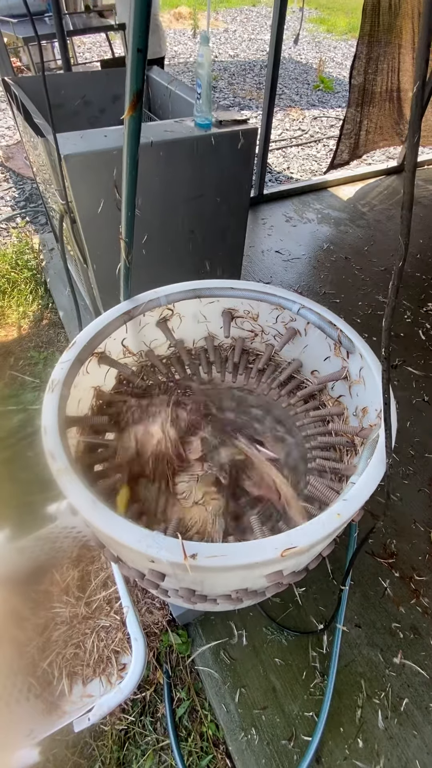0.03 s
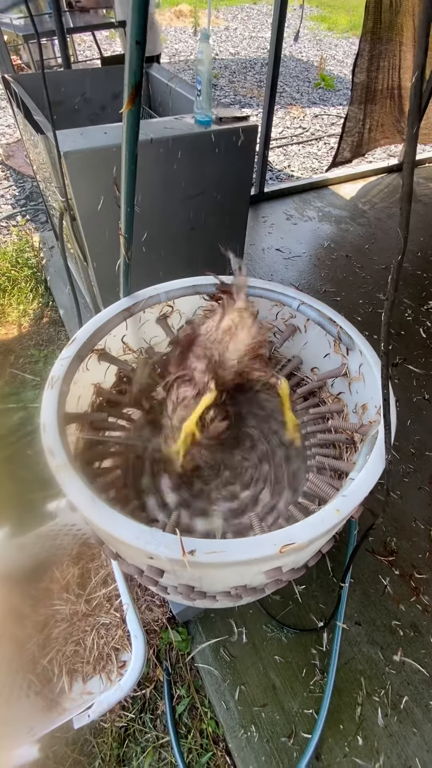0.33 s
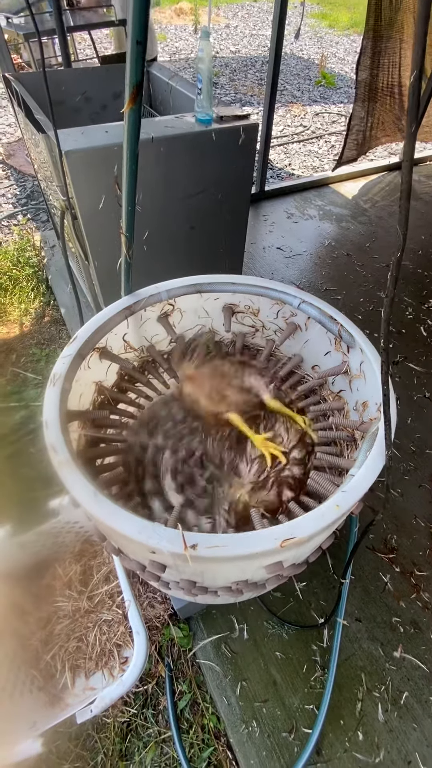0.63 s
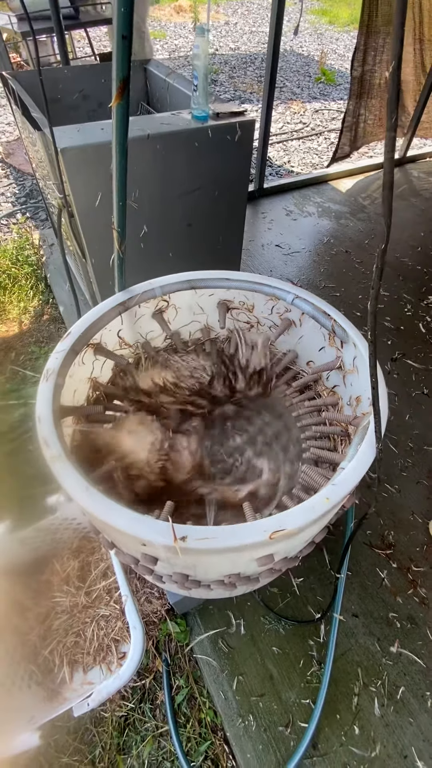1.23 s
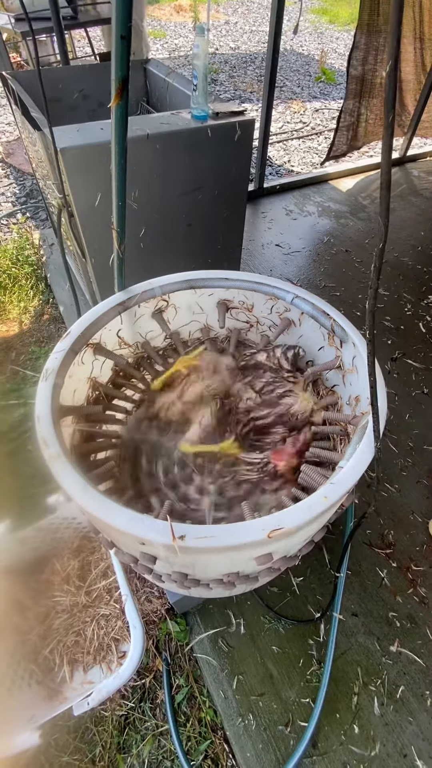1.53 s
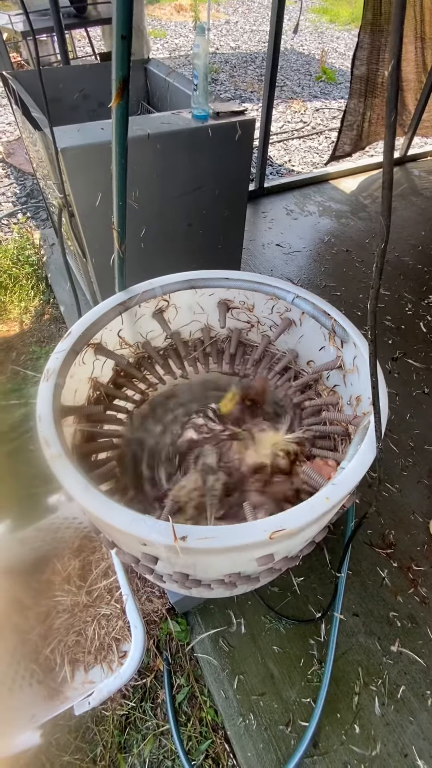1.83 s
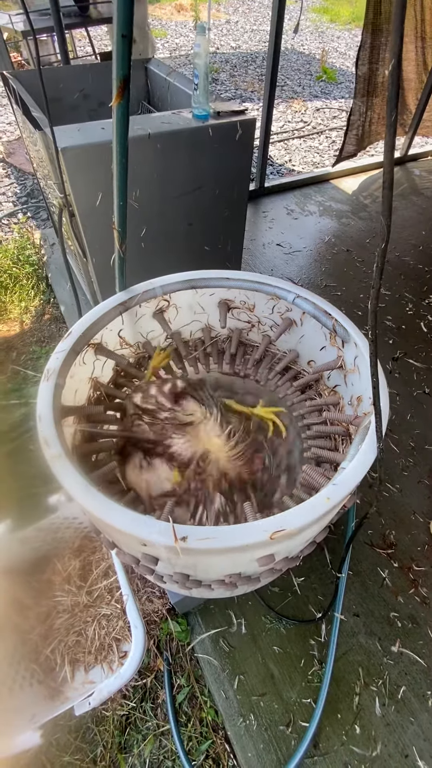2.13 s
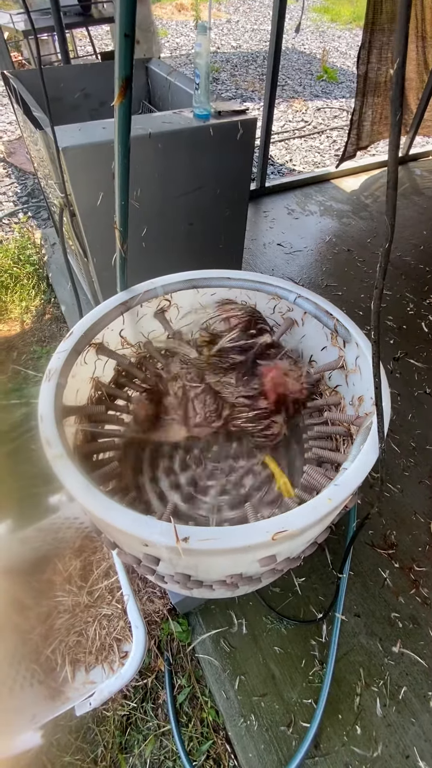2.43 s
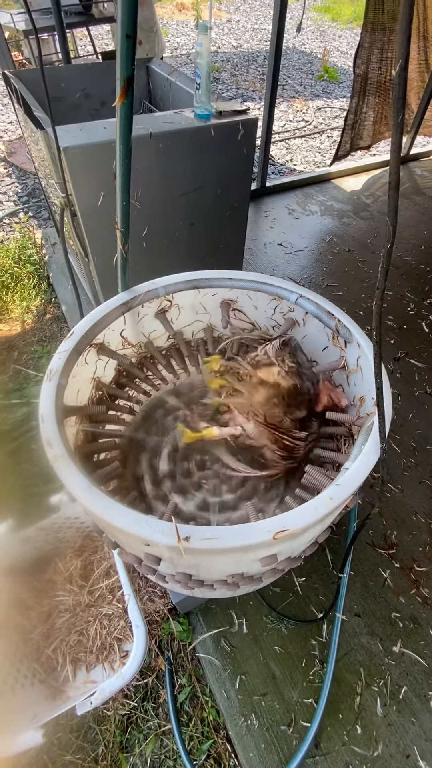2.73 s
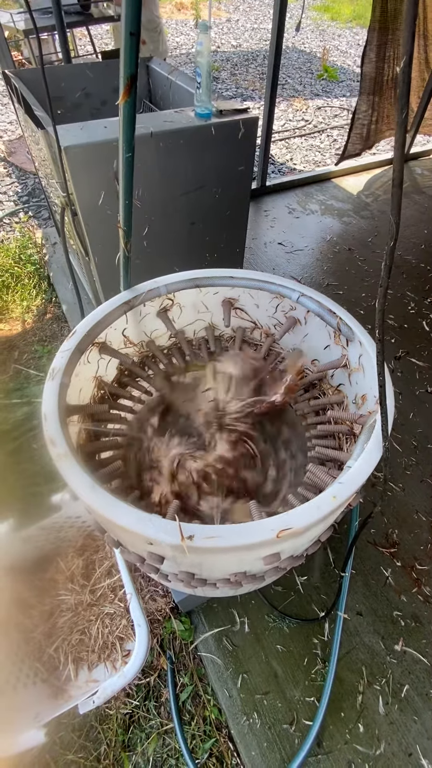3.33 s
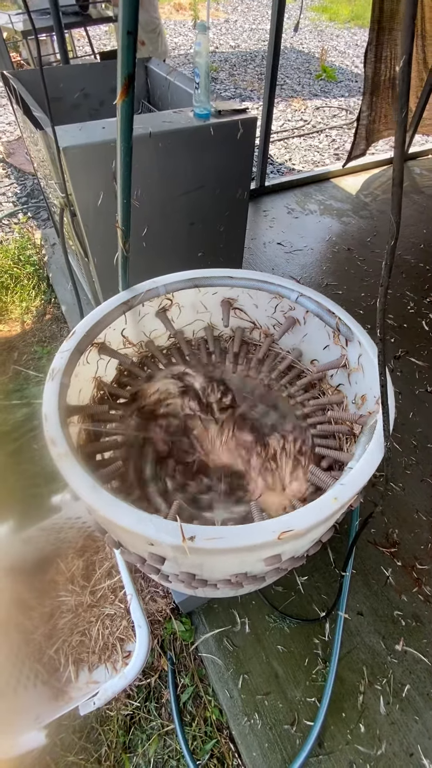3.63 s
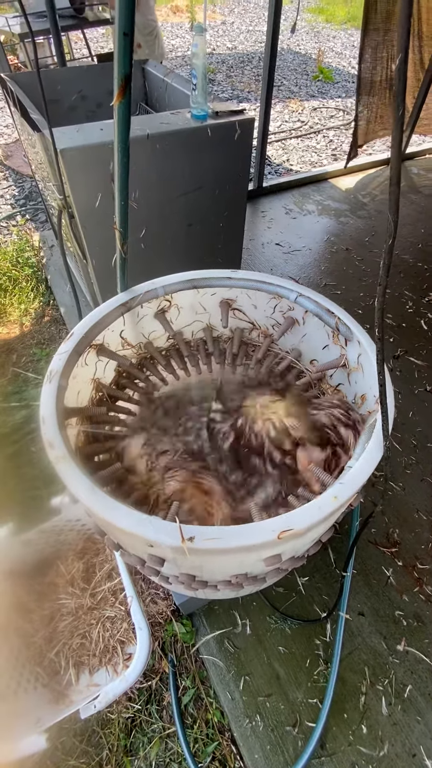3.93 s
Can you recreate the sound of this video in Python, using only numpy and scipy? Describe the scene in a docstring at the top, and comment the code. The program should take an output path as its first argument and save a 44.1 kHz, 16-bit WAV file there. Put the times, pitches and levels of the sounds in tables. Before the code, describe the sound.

Spinning poultry plucker drones steadily, birds thumping hollowly against the plastic drum amid hissing spray.

```python
"""A hard, hollow knock lands over the roar of a tub plucker running outdoors.
Its motor hums while rubber fingers drum on wet carcasses and set the plastic tub ringing.
The birds rub and slap along the wall and knock against it now and then; feet and wing tips
crack on it, and water spatters. A close pair of microphone ports picks it all up."""
import sys
import numpy as np
from scipy import signal
from scipy.fft import rfft, irfft
from scipy.io import wavfile
from scipy.ndimage import uniform_filter1d

SR = 44100
rng = np.random.default_rng(int(sys.argv[2]) if len(sys.argv) > 2 else 0)


def bounce(signal):
    """Save signal as a 16-bit WAV file at the path given by the first command-line argument."""
    frames = np.transpose(np.atleast_2d(signal))
    limited = np.clip(frames, -1, 1)
    pcm = np.round(limited * 32767).astype(np.int16)
    wavfile.write(sys.argv[1], SR, pcm)


N = 176400
T = np.arange(N) / SR
BIN_HZ = np.maximum(np.arange(N // 2 + 1) * SR / N, 1)


# The notes the tub rings at. Each row: pitch in Hz, width in Hz, level in dB before the roar swells.
TUB_NOTES = [(66.6, 8.5, -44), (99.2, 65, -41.5), (119.3, 26, -27), (169.2, 37, -26.5),
             (223.5, 17.5, -27.5), (248, 29.5, -29), (291.5, 20.7, -30.5), (342, 5.9, -30.5),
             (364.3, 24, -29.5)]
def tub():
    """Rubber fingers drum on the tub; the tumbling birds shift the weight from note to note."""
    out = 0
    for hz, width_hz, db in TUB_NOTES:
        hits = clicks(per_s=1100, spread_db=1.5)
        hits = np.pad(hits, ((0, 0), (SR // 2, 0)), "wrap")  # a run-up, so it rings from the start
        ring = resonate(hits, hz, 2 * width_hz)
        ring = resonate(ring, hz, 2 * width_hz)[:, -N:]  # a second pass narrows the note
        out = out + from_db(db + 1.5 * drift(5.8)) * rms_one(ring)
    return out


# The tones of the motor and drive. Each row: pitch in Hz, level in dB before the roar swells.
MOTOR_TONES = [(64, -49), (120, -29.5), (330.2, -31), (359.8, -29.5)]
def motor():
    """The motor hums, shaken in level and pitch by the tumbling birds."""
    out = 0
    for hz, db in MOTOR_TONES:
        level = from_db(db + 3.5 * drift(6))
        phase = 2 * np.pi * hz * T + .5 * drift(5)
        out = out + level * np.sqrt(2) * np.sin(phase)
    return out


# The weight on the fingers. Each row: time in seconds, level in dB (only its rise and fall count).
FINGER_LOAD = [(0, -17.5), (.06, -19), (.48, -22.5), (.8, -18), (.96, -20), (1.22, -19.5), (1.42, -19.5),
               (1.6, -16), (1.66, -18.5), (1.87, -19.5), (1.96, -20.5), (2.21, -16.5), (2.36, -19.5),
               (2.68, -20), (3.06, -18.5), (3.15, -19), (3.3, -18), (3.9, -19.5)]
def machine():
    """Tub and motor blend into one roar that swells as the birds press on the fingers."""
    roar = evened(to_stereo(tub()) + motor())
    load_db = over_time(FINGER_LOAD)
    return roar * from_db(load_db - load_db.mean())


# How hard the birds rub along the wall. Each row: time in seconds, level in dB.
RUB_LEVEL = [(0, -24.5), (.27, -32.5), (.35, -25.5), (.43, -33), (.64, -27.5), (.88, -30), (.98, -32),
             (1.045, -27), (1.17, -31), (1.41, -29.5), (1.51, -23), (1.6, -27), (1.67, -29.5), (2.9, -30.5),
             (2.975, -24), (3.02, -32.5), (3.08, -29.5), (3.8, -25), (4, -30.5)]
# The tone of the rubbing. Each row: frequency in Hz, relative strength in dB.
RUB_TONE = [(25, -66.5), (90, -38.5), (380, -22.5), (430, -1.5), (515, 4.5), (610, 1.5), (1000, -7.5),
            (1400, -11), (2100, -23), (4000, -58)]
def rubbing(surge):
    """Wet feathers drag over the fingers in a dense run of small slips, louder at each slap."""
    slips = coloured(clicks(per_s=2500, spread_db=1), RUB_TONE)
    level = from_db(over_time(RUB_LEVEL) + 1.5 * drift(31))
    return level * rms_one(slips * (1 + .45 * surge))


def slap_surges(decay_s=.007):
    """Small wet slaps at random: a loudness curve that jumps at each one and dies quickly."""
    contacts = np.abs(clicks(per_s=38, spread_db=1.4)[0])
    return signal.lfilter([1], [1, -np.exp(-1 / (decay_s * SR))], contacts + 1e-18)


# A carcass hits the wall. Each row: start in seconds, strength in dB, pitch it rings most in Hz.
BLOWS = [(0.0157, -13, 1260), (0.02, -7.5, 1200), (.022, -9.5, 1020), (.345, -25, 553), (1.034, -21, 642),
         (1.482, -23, 800), (1.514, -15, 574), (1.55, -14, 600), (1.593, -14, 349), (1.805, -14.5, 1460),
         (2.977, -17, 1194), (2.99, -18, 896), (3.072, -20, 1210), (3.4824, -11.5, 1000), (3.489, -10, 883),
         (3.786, -5.5, 510), (3.798, -9, 448), (3.8035, -9.5, 910)]
# The notes of the struck wall. Each row: pitch in Hz, gain in dB, seconds to fade by 60 dB.
WALL_NOTES = [(371, -1, 0.061), (494, 4, 0.016), (610, 2.5, 0.039), (714, -5, 0.047), (945, -11, 0.056),
              (1075, -3.5, 0.02), (1375, -0.5, 0.0092), (1780, 1.5, 0.012)]
def knocks(width_octaves=.5):
    """Each blow is a push and a short squelch that ring the wall, most at notes near its own pitch."""
    pushes = []
    for start, db, _ in BLOWS:
        push = from_db(-25) * rng.standard_normal(N) * dying(start, decay_s=.007)  # the squelch
        push[int(start * SR)] += 1  # the hit itself
        pushes.append(from_db(db) * push)
    pushes, pitches = np.array(pushes), np.array(BLOWS)[:, 2]
    out = 0
    for k, (hz, db, fade_s) in enumerate(WALL_NOTES):
        shares = np.exp(-.5 * (np.log2(hz / pitches) / width_octaves) ** 2)
        fade, step = from_db(-60 / (fade_s * SR)), 2 * np.pi * hz / SR
        ring = signal.lfilter([0, np.sin(step)], [1, -2 * fade * np.cos(step), fade ** 2], shares @ pushes)
        sign = (-1) ** (k // 2)  # every other pair of notes swings the opposite way
        out = out + sign * from_db(db) * ring
    return out


# Air trapped by the hardest blows. Each row: start in seconds, level in dB, starting pitch in Hz,
# seconds to swell.
AIR_POCKETS = [(.0225, -3, 675, 0.0082), (3.4815, -6.5, 793, 0.0053), (3.782, -12.5, 538, 0.0045)]
def hollows(sag_per_s=11.8):
    """A pocket of air swells into a short hollow tone whose pitch sags as the carcass smothers it."""
    out = 0
    for start, db, hz, swell_s in AIR_POCKETS:
        age = np.clip(T - start, 0, 5 * swell_s)
        rise = (age / swell_s) ** 2
        phase = 2 * np.pi * hz * age * (1 - sag_per_s * age / 2)
        out = out + from_db(db) * rise * np.exp(1 - rise) * np.sin(phase)
    return out


# Sharp hits on the wall. Each row: start in seconds, level in dB, centre pitch in Hz.
SHARP_HITS = [(0.0692, -14.5, 2600), (1.481, -14.5, 2090), (1.5426, -13, 3030), (1.578, -23, 4500),
              (1.626, -20.5, 2800), (1.657, -28, 5500), (1.755, -22, 5500), (1.7882, -25, 3300),
              (1.803, -21.5, 2000), (2.0177, -17.5, 6000), (2.0255, -17, 7000), (2.574, -15, 2700),
              (2.982, -18.5, 4200), (3.014, -24.5, 3500), (3.6406, -17.5, 3400), (3.753, -21, 3400),
              (3.804, -15.5, 1380), (3.982, -29.5, 2460)]
def cracks():
    """Feet, wing tips and wet skin smack the wall in short, bright bursts of noise."""
    out = 0
    for start, db, hz in SHARP_HITS:
        burst = rms_one(resonate(rng.standard_normal((2, N)), hz, width_hz=hz))
        out = out + from_db(db) * dying(start, decay_s=.0028) * burst
    return out


# Splashes. Each row: start in seconds, level in dB, centre pitch in Hz, decay time in seconds.
FEATHER_SLAPS = [(.015, -22.5, 5760, 0.023), (0.625, -23.5, 4560, 0.017), (0.642, -28, 4100, .025),
                 (.872, -30.5, 1970, 0.034), (1.017, -28, 2460, 0.048), (1.448, -28.5, 1590, 0.084),
                 (3.07, -25, 1900, 0.0089)]
def splashes():
    """Wet feathers slap the wall and shed a dying shower of droplets."""
    out = 0
    for start, db, hz, decay_s in FEATHER_SLAPS:
        shower = rms_one(resonate(clicks(per_s=2000, spread_db=2), hz, width_hz=hz))
        out = out + from_db(db) * dying(start, decay_s) * shower
    return out


# How the spray rises and falls. Each row: time in seconds, gain in dB.
SPRAY_LEVEL = [(0, -28.5), (.09, -34), (.19, -33), (.54, -34), (.6, -35), (.68, -34), (.76, -37.5),
               (1.0, -40), (1.04, -38), (1.41, -38), (1.54, -31), (1.68, -34.5), (1.95, -39), (2.1, -35.5),
               (2.55, -36.5), (2.92, -41), (3.05, -35), (3.33, -38), (3.365, -32), (3.52, -33.5),
               (3.66, -32), (3.8, -31.5), (3.93, -40), (4, -30.5)]
# The tone of the spray. Each row: frequency in Hz, relative strength in dB.
SPRAY_TONE = [(600, -20), (1500, -3), (3000, 0), (4500, -1.5), (6000, 0), (8000, -2), (13000, -4.5),
              (16000, -7)]
def spray(surge):
    """Flung water: a fine hiss that flickers octave by octave, with drops and ticks in it."""
    hiss = 0
    for octave in range(9, 15):  # bands centred from 512 to 16384 Hz
        band = np.sqrt(np.maximum(1 - np.abs(np.log2(BIN_HZ) - octave), 0))
        noise = irfft(rfft(rng.standard_normal((2, N))) * band, N)
        hiss = hiss + noise * from_db(3.5 * drift(10))
    water = from_db(2) * coloured(hiss, SPRAY_TONE)
    water += from_db(-1) * coloured(drops(), SPRAY_TONE)
    water += from_db(-10.5) * ticks()
    level = from_db(over_time(SPRAY_LEVEL) + .7 * drift(11))
    return water * level * rms_one(1 + .35 * surge)


def drops():
    """Droplets burst and ring for a few cycles, at pitches spread over about four octaves."""
    return patter(np.geomspace(1000, 15000, 28), per_s=4000, spread_db=-1, width_share=.041)


def ticks():
    """Rubber fingers flick off wet skin with small, high ticks."""
    return patter(np.geomspace(2200, 6500, 7), per_s=70, spread_db=1.5, width_share=.3)


def mist():
    """The finest spray makes a steady, high sizzle."""
    return from_db(-45.5) * rms_one(resonate(rng.standard_normal((2, N)), hz=14500, width_hz=3000))


def from_db(db):
    """Turn decibels into a number to multiply by."""
    return 10 ** (np.asarray(db) / 20)


def rms_one(x):
    """Scale a sound so its average strength (rms) is 1."""
    return x / np.sqrt(np.mean(x ** 2) + 1e-20)


def over_time(rows):
    """Join a table's points into a curve over time."""
    return np.interp(T, *np.transpose(rows))


def over_pitch(rows):
    """Join a table's points into a curve over frequency, with octaves evenly spaced."""
    hz, value = np.transpose(rows)
    return np.interp(np.log(BIN_HZ), np.log(np.maximum(hz, 1)), value)


def coloured(x, tone):
    """Shape a sound's lows and highs with a tone table, at strength 1."""
    return rms_one(irfft(rfft(x) * from_db(over_pitch(tone)), N))


def drift(rate_hz):
    """A random wobble of strength 1, mostly slower than the given rate."""
    return rms_one(irfft(rfft(rng.standard_normal(N)) / (1 + (BIN_HZ / rate_hz) ** 2), N))


def clicks(per_s, spread_db):
    """Two unrelated streams of random clicks of uneven size."""
    sizes = from_db(spread_db * np.minimum(rng.exponential(1, (2, N)), 5))
    signs = rng.choice([-1, 1], (2, N))
    return sizes * signs * (rng.random((2, N)) < per_s / SR)


def resonate(x, hz, width_hz):
    """Make a sound ring at one pitch; a smaller width rings longer."""
    fade = np.exp(-np.pi * width_hz / SR)
    feedback = [1, -2 * fade * np.cos(2 * np.pi * hz / SR), fade ** 2]
    return signal.lfilter(np.array([1, 0, -1]) * (1 - fade ** 2) / 2, feedback, x + 1e-18)


def patter(pitches, per_s, spread_db, width_share):
    """Random clicks, each ringing at one of the given pitches."""
    rings = (resonate(clicks(per_s / len(pitches), spread_db), hz, width_share * hz) for hz in pitches)
    return rms_one(sum(rings))


def dying(start, decay_s):
    """A loudness curve that jumps to 1 and dies away."""
    return (T >= start) * np.exp(-np.minimum(np.abs(T - start) / decay_s, 40))


def evened(x, window_s=.25):
    """Smooth out a sound's slow swings and keep its average level."""
    power = np.mean(x ** 2, axis=0)
    return x * np.sqrt(power.mean() / uniform_filter1d(power, int(window_s * SR)))


# How alike left and right sound. Each row: frequency in Hz, likeness from 0 (unrelated) to 1.
STEREO_LIKENESS = [(130, .9995), (370, .99), (650, .75), (1300, .72), (1850, .9), (2700, .42), (4500, .45),
                   (8100, .72), (8600, .998), (12000, .998), (13300, .58)]
def to_stereo(pair):
    """Blend two unrelated sounds into left and right, nearly the same in the bass."""
    alike = np.clip(over_pitch(STEREO_LIKENESS), 0, 1)
    mid, side = rfft(pair)
    return irfft(mid * np.sqrt((1 + alike) / 2) + side * np.sqrt((1 - alike) / 2) * [[1], [-1]], N)


# How far left leads right. Each row: frequency in Hz, lead in radians.
# From about 8.5 to 12 kHz the two sides are opposite, so the hiss sounds wide.
LEFT_LEAD = [(190, 0), (450, -.35), (590, -.8), (720, 0), (2000, 0), (2900, 1.2), (4050, .3), (4950, 2.7),
             (6000, 1.6), (7500, 2.1), (8450, 3.14), (12200, 3.14), (15800, 6.3)]
# How much louder the left side is. Each row: frequency in Hz, left minus right in dB.
LEFT_LOUDER = [(180, 0), (320, .6), (450, 0), (530, -3), (730, -5), (1100, .7), (2000, -.3), (3000, -3.7),
               (5600, -4), (7600, 0)]
def widen(sound):
    """Give each frequency its own timing and balance between left and right."""
    sides = np.array([[.5], [-.5]])
    balance = from_db(sides * over_pitch(LEFT_LOUDER))
    lead = np.interp(BIN_HZ, *np.transpose(LEFT_LEAD))
    return irfft(rfft(sound) * balance * np.exp(1j * sides * lead), N)


def scene():
    """The roaring machine, the birds and the water, spread between left and right."""
    surge = slap_surges()  # the same slaps lift both the rubbing and the spray
    roar = machine()
    birds_and_water = to_stereo(rubbing(surge) + spray(surge) + cracks() + splashes() + mist())
    return widen(roar + birds_and_water + knocks() + hollows())


def record(dry):
    """Round off the loudest peaks and cut the treble above 16000 Hz."""
    rounded = 1.3 * np.tanh(dry / 1.3)
    return signal.sosfilt(signal.ellip(12, .1, 80, 16000, fs=SR, output="sos"), rounded)


dry = scene()
out = record(dry)
bounce(out)
```